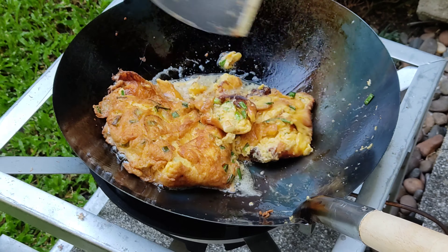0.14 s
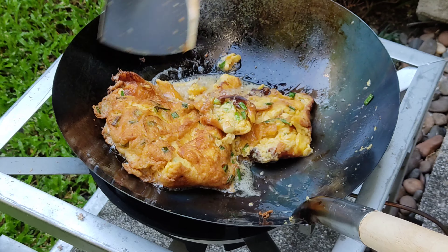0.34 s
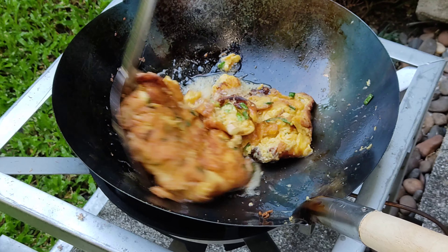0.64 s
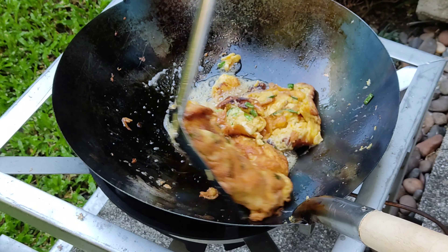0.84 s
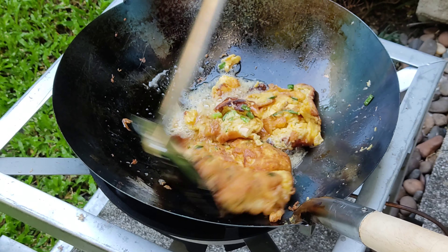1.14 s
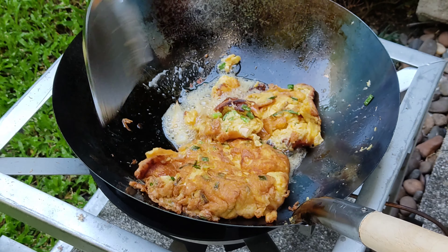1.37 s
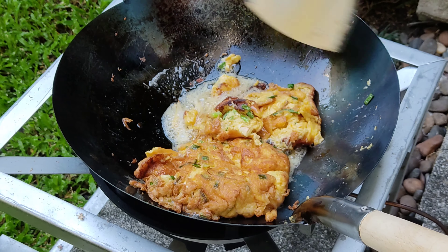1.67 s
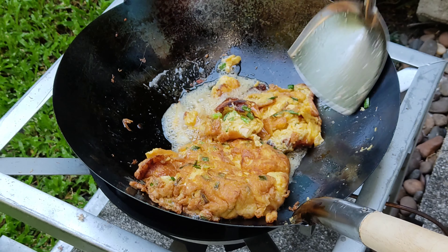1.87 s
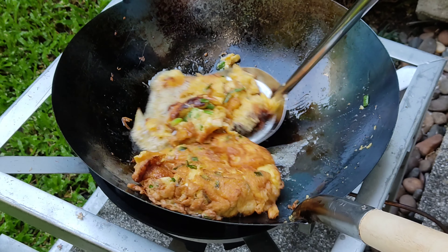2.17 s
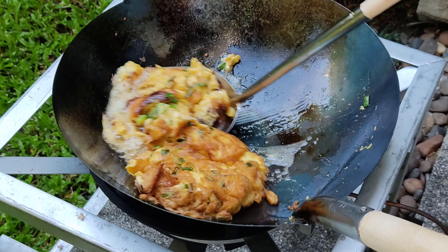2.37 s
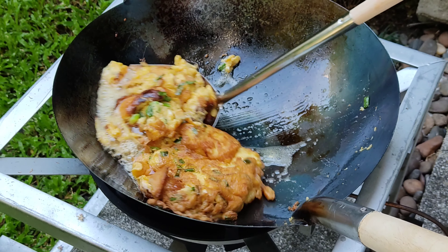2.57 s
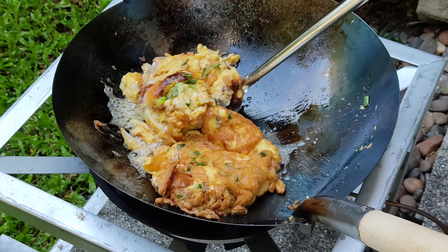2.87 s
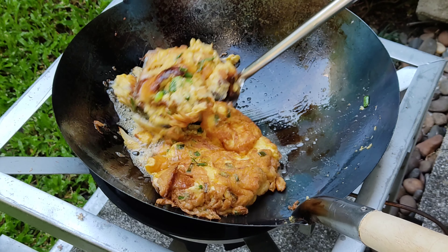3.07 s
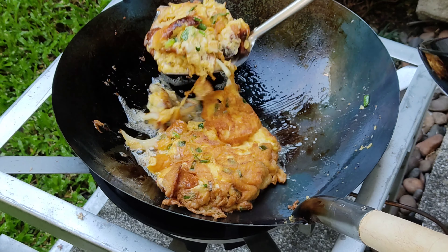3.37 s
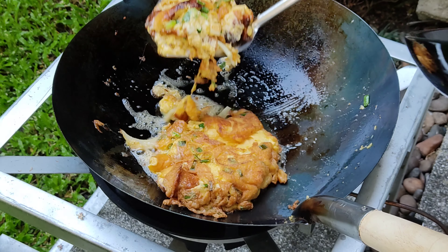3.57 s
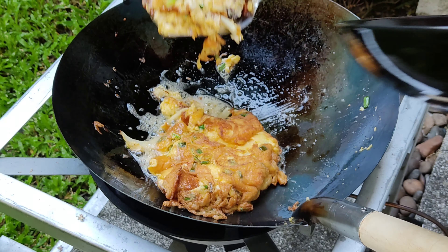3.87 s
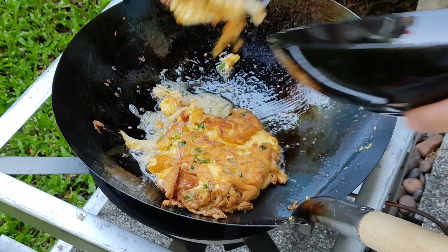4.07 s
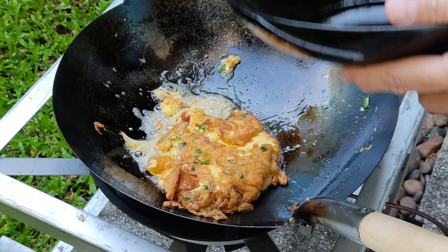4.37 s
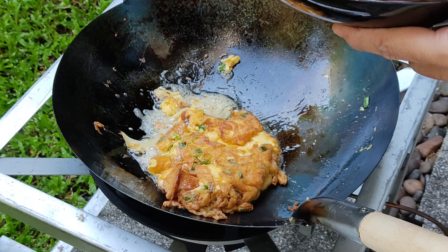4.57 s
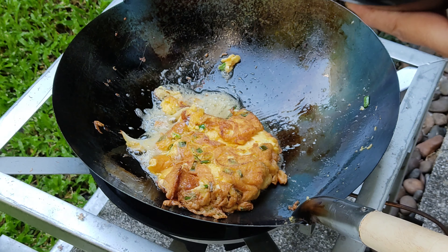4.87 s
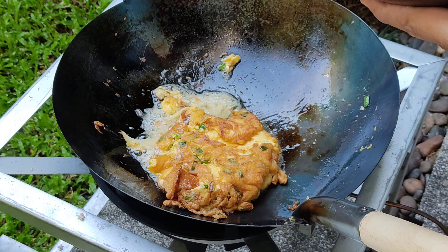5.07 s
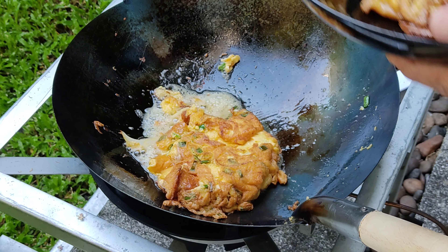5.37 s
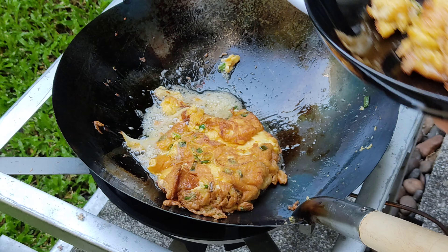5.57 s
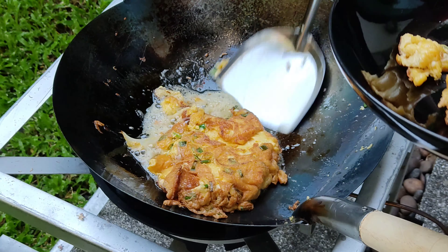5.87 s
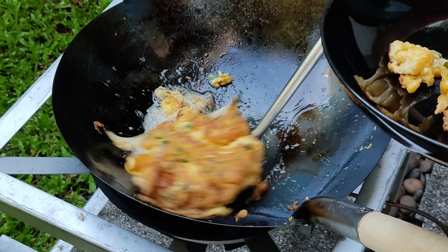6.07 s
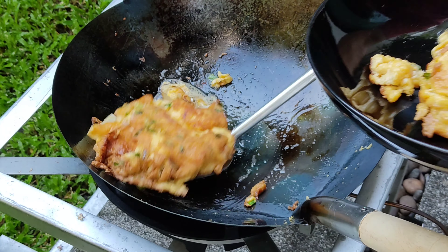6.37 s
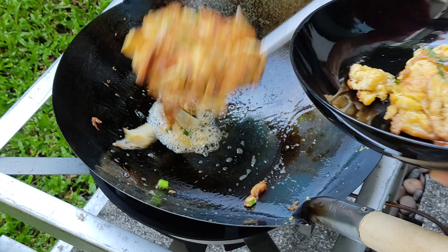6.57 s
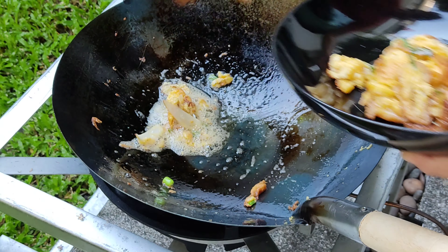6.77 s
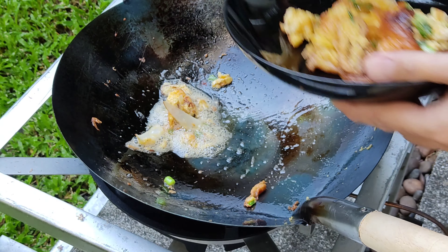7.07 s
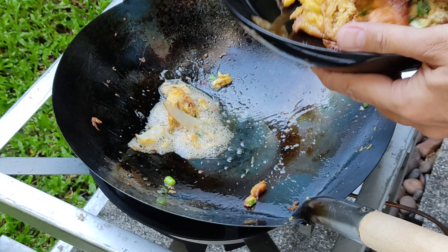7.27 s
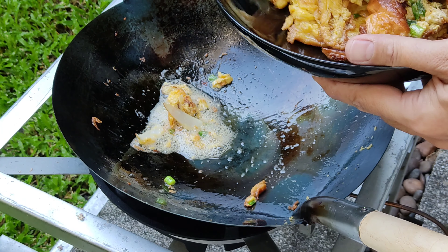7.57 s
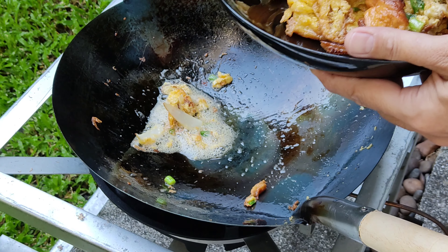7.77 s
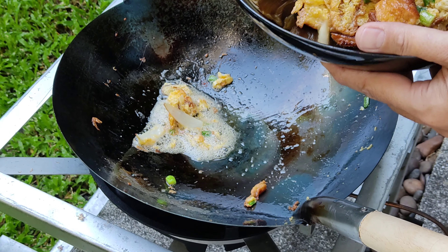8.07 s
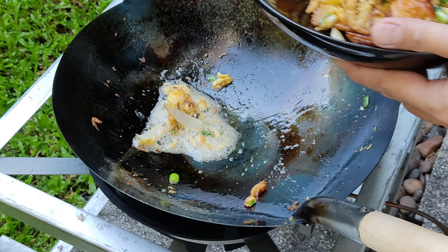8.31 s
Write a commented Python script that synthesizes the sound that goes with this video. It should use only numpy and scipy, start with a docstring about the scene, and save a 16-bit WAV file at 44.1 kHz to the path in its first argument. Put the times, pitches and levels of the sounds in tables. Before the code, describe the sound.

A close stereo microphone in a yard, battered by wind in its left side with irregular thuds and rumbling puffs. Beneath it are a thin flame hiss and light crackling oil. A metal spatula cracks against the wok and scrapes in three separate passes, ringing shortly with a faint metallic hum. Hard dry knocks on a plate fall between the second and third passes, and once at the end.

```python
"""Outdoors in a yard, over a gas burner, an omelette is lifted out of a steel wok.
The metal spatula lands (noise cracks and ringing modes), scrapes down the wall and scoops (trains of tiny
catches through moving resonances), and clacks against a plate, twice between the scrapes and once after
the last. Oil sizzles and spits in noise bursts, the flame hisses as shaped noise, and low noise in puffs
and sharp kicks is the moving air that buffets the microphone, mostly its left port."""
import sys
import numpy as np
from scipy import signal
from scipy.fft import rfft, irfft, next_fast_len
from scipy.io import wavfile
from scipy.ndimage import uniform_filter1d, map_coordinates

SR = 44100
rng = np.random.default_rng(int(sys.argv[2]) if len(sys.argv) > 2 else 0)


def transcribe(signal):
    """Save signal, clipped to [-1, 1], as a 16-bit WAV file at the path in sys.argv[1]."""
    frames = np.atleast_2d(signal).T
    limited = np.clip(frames, -1, 1)
    pcm = np.round(limited * 32767).astype(np.int16)
    wavfile.write(sys.argv[1], SR, pcm)


N = 372200
T = np.arange(N) / SR  # time of each sample in seconds

# The spatula lands in the wok. Each row: time in seconds, crack level in dB, blade ring level in dB,
# pitch of the touched spot's ping in Hz, ping level in dB over the crack level.
LANDINGS = [(0.552, -4.5, -26, 2130, -23), (.559, -17.5, -18, 2760, -2), (1.925, -6, -35, 1950, -13),
            (1.94, -23.5, -47, 2660, 1), (3.069, -22, -56, 5470, -14), (5.925, -27.5, -12.5, 1840, 2),
            (5.9377, -16, -13.5, 707, -3)]
# High modes of the spatula. Each row: pitch in Hz, relative level in dB, time to fall by 60 dB in seconds.
SPATULA_MODES = [(3168, -3, .1), (5440, -6, .11), (5862, -3, .13), (6023, -3, .13), (7400, -1, .12),
                 (7721, -1, .15), (7953, -3, .13), (8258, -1, .11), (8662, -2, .15), (8817, -3, .13),
                 (8963, -2, .12)]
# How a push of the spatula weakens while it lasts, and after its end, in dB a second.
PUSH_SAG_DB_PER_S, PUSH_FALL_DB_PER_S = 14, 271


def amp(db):
    """Decibels to gain."""
    return 10 ** (np.asarray(db) / 20)


def unit(x):
    """Scale to rms 1."""
    return x / np.sqrt(np.mean(x ** 2) + 1e-20)


def along(points, hz):
    """Read a curve of (Hz, value) points at any frequency, on a log axis."""
    f, v = np.transpose(points)
    return np.interp(np.log(hz + 1), np.log(f + 1), v)


def curves(rows):
    """One value per sample for each column after the time."""
    s, *cols = np.transpose(rows)
    return [np.interp(T, s, c) for c in cols]


def wobble(rate):
    """A smooth random curve with rate knots a second."""
    knots = rng.standard_normal(int(N * rate / SR) + 4)
    return map_coordinates(knots, [T * rate], order=2)


def envelope(start, rise, length, sag, fall):
    """A rise, a hold that sags, and after length seconds a release; sag and fall in dB a second."""
    t = np.maximum(T - start, 0)
    return np.minimum(t / rise, 1) * amp(-sag * t - fall * np.maximum(t - length, 0))


def add(track, s, sound):
    """Mix a sound in at time s."""
    part = track[..., max(round(s * SR), 0):][..., :sound.shape[-1]]
    part += sound[..., :part.shape[-1]]


def filtered(x, response):
    """Multiply the spectrum of x by a response that depends on frequency."""
    n = x.shape[-1]
    m = next_fast_len(n + 8192)
    return irfft(rfft(x, m) * response(np.fft.rfftfreq(m, 1 / SR)), m)[..., :n]


def coloured(x, spectrum):
    """x shaped by a spectrum, at rms 1."""
    return unit(filtered(x, lambda hz: amp(along(spectrum, hz))))


def spread(pair):
    """Two unrelated signals become left and right, alike at long wavelengths."""
    # Each row: frequency in Hz, likeness of left and right from 0 to 1.
    likeness = [(100, 1), (700, 0.33), (1600, 0.039), (3200, 0), (12000, 0)]
    turn = lambda hz: np.arccos(np.clip(along(likeness, hz), -1, 1)) / 2
    mid, side = filtered(pair, lambda hz: np.array([np.cos(turn(hz)), np.sin(turn(hz))]))
    return np.array([mid + side, mid - side])


def grainy(rate, size_db):
    """Stereo train of tiny noise bursts of uneven size, about rate a second."""
    sizes = (rng.random(N) < rate / SR) * amp(size_db * np.minimum(rng.exponential(size=N), 4))
    power = np.convolve(sizes ** 2, np.exp(-np.arange(64) / 10))[:N]
    return unit(np.sqrt(power) * rng.standard_normal((2, N)))


def burst(spectrum, t60):
    """A stereo crack of coloured noise that dies away by 60 dB in t60 seconds."""
    t = T[:SR // 4]
    noise = spread(rng.standard_normal((2, len(t))))
    return coloured(noise, spectrum) * amp(-60 * t / t60)


def ring(modes):
    """Struck modes as fading sines; the higher ones reach the two ports more out of phase."""
    t = T[:int(SR * min(2, 2 * max(t60 for *_, t60 in modes)))]
    out = np.zeros((2, len(t)))
    for hz, db, t60 in modes:
        phase = rng.normal(0, hz / 5000, (2, 1))
        strength = amp(db + rng.normal() - 60 * t / t60)  # each strike differs a little
        out += strength * np.sin(2 * np.pi * hz * t + phase)
    return out


def shimmer(x, t60, count):
    """The wok's crowd of high modes rings on after each bit of x."""
    t = T[:SR // 4]
    hz = rng.uniform(2400, 15000, (count, 1))
    weights = rng.standard_normal((2, count))
    response = weights @ np.sin(2 * np.pi * hz * t) * amp(-60 * t / t60)
    return signal.fftconvolve(x, response / np.linalg.norm(response[0]), axes=1)[:, :N]


def resonate(x, peaks, bend):
    """x through resonances that all move in pitch with bend."""
    hz, s, z = signal.stft(x, SR, nperseg=1024)
    pitch = np.interp(s, T, bend)
    gain = 0
    for f, width, db in peaks:
        distance = (hz[:, None] - f * pitch) / (width / 2)
        gain = gain + amp(db) / (1 + distance ** 2)
    return unit(signal.istft(z * gain, nperseg=1024)[1][:, :N])


def crossing(x):
    """The contact slides over nodes and antinodes, so narrow bands swell, glide and drop out."""
    depth = .014  # share by which the bands wander in pitch as the contact moves
    z = signal.stft(x, nperseg=512)[2]
    rows, cols = np.indices(z.shape[1:])
    drift = 1 + depth * wobble(14)[np.linspace(0, N - 1, z.shape[2]).astype(int)]
    field = map_coordinates(rng.standard_normal(z.shape[1:]), [rows * drift / 2, cols / 6], order=2)
    gain = np.hypot(np.tanh(.7 * field), .08)  # never quite silent
    return unit(signal.istft(z * gain, nperseg=512)[1][:, :N])


def scrape():
    """The edge catches on the steel thousands of times a second; the blade's resonances sink as it slides down."""
    # Pushes of the spatula along the steel. Each row: start in seconds, rise in seconds,
    # length in seconds, rasp level in dB, level in dB of the groan of the pressed wall.
    pushes = [(0.548, 0.0057, 0.08, -32, -34.5), (0.632, 0.0086, 0.061, -29, -37.5),
              (1.925, 0.0041, 0.038, -32, -36), (2, 0.048, 0.22, -34, -44.5),
              (2.183, 0.011, 0.015, -30, -49), (2.225, 0.028, 0.057, -40.5, -48),
              (2.362, 0.068, .08, -47, -37.5), (2.417, .02, 0.094, -45.5, -38.5),
              (2.646, 0.0033, 0.005, -49, -39), (2.676, 0.014, 0.049, -55, -39),
              (3.068, 0.0036, 0.004, -43, -40), (3.08, .004, .02, -50.5, -50),
              (5.919, 0.013, 0.13, -38, -33.5), (5.962, 0.078, 0.18, -29.5, -42),
              (6.116, 0.024, 0.12, -34.5, -41.5), (6.302, 0.057, 0.12, -51, -44)]
    # Resonances of the sliding blade. Each row: pitch in Hz before it bends, width in Hz, relative level in dB.
    sliding = [(1666, 125, 2.5), (2060, 400, -7.5), (2740, 84, 3), (3220, 44, 7), (4570, 420, 0),
               (5700, 290, 2), (6320, 150, 2), (7370, 160, 5), (7800, 82, 6.5), (8750, 260, -1)]
    # Low resonances of the wall under a hard push. Each row: pitch in Hz before it wavers, width in Hz,
    # relative level in dB.
    groan = [(668, 80, 3.5), (1130, 200, -3), (1520, 110, -6), (2050, 400, -17)]
    # Colour of the rasp. Each row: frequency in Hz, relative level in dB.
    rasp_colour = [(300, -28), (1000, -51), (2300, -8), (3100, -6.5), (4000, -3.5), (5000, -5.5),
                   (6000, -6.5), (7500, -4.5), (9000, -3.5), (10000, -14), (11300, -23.5), (12500, -16),
                   (15000, -29.5)]
    sink_per_s2 = 0.193  # share by which the resonances sink after a landing, per second squared

    rasp, press, bend = np.zeros(N), np.zeros(N), np.ones(N)
    for s, rise, length, rasp_db, press_db in pushes:
        contact = envelope(s, rise, length, PUSH_SAG_DB_PER_S, PUSH_FALL_DB_PER_S)
        rasp = np.maximum(rasp, contact * amp(rasp_db))
        press = np.maximum(press, contact * amp(press_db))
    for landing, *_ in LANDINGS:
        bend = np.where(T > landing, 1 - sink_per_s2 * np.clip(T - landing, 0, 1) ** 2, bend)

    waver = 1 + .024 * wobble(16)
    judder = amp(1.9 * wobble(190))  # stick and slip
    hand = amp(.7 * wobble(28))  # the pressure of the hand is uneven
    unevenness = hand * judder
    edge = rasp * unevenness * crossing(coloured(grainy(rate=3300, size_db=1.5), rasp_colour))
    catches = spread(grainy(rate=2000, size_db=3.5))
    blade = rasp * unevenness * crossing(resonate(catches, sliding, bend * waver))
    wall = press * unevenness * resonate(catches, groan, waver)
    afterring = shimmer(edge, t60=0.07, count=1200)
    modes = ring(SPATULA_MODES)[:, :SR // 4]
    singing = signal.fftconvolve(edge, modes / np.linalg.norm(modes[0]), axes=1)[:, :N]
    return amp(3.5) * edge + amp(0.5) * afterring + amp(-5.5) * singing + amp(3.0) * blade + wall


def grate(length, first_hz, last_hz, width):
    """A rough gliding partial: a tone whose strength and phase tremble."""
    t = T[:round((length + .15) * SR)]
    phase = 2 * np.pi * np.cumsum(np.interp(t, [0, length], [first_hz, last_hz])) / SR
    knots = rng.standard_normal((4, 1024))
    place = t * width * first_hz
    tremble = np.array([map_coordinates(k, [place], order=2, mode="wrap") for k in knots])
    return tremble[:2] * np.cos(phase) + tremble[2:] * np.sin(phase)


def partials():
    """During the scrapes the edge bites and grates, each time at one sliding pitch."""
    # Each row: start in seconds, length in seconds, first pitch in Hz, last pitch in Hz, level in dB.
    bites = [(.62, .05, 1720, 1650, -32), (.625, .04, 2850, 2700, -38), (.662, .045, 6100, 5900, -28),
             (2.04, .04, 1990, 1940, -33), (2.088, .045, 3190, 3260, -32), (2.115, .07, 1680, 1620, -37),
             (2.1, .05, 4400, 4600, -33), (2.19, .025, 6200, 6050, -28), (2.25, .2, 1570, 1520, -47),
             (2.395, .065, 3200, 3080, -43), (6.05, .033, 3200, 3380, -30), (6.05, .06, 5850, 5980, -25),
             (6.135, .04, 5600, 5750, -31), (6.21, .03, 5950, 5850, -29)]
    rise_s, width = .012, .04  # width of the tremble as a share of the pitch
    out = np.zeros((2, N))
    for s, length, first_hz, last_hz, db in bites:
        tone = grate(length, first_hz, last_hz, width)
        shape = envelope(0, rise_s, length, PUSH_SAG_DB_PER_S, fall=1400)
        add(out, s, amp(db) * tone * shape[:tone.shape[1]])
    return out


def clinks():
    """Each landing cracks and rings the blade briefly; the wok wall hums for longer."""
    # Modes of the blade pressed on the steel. Each row: pitch in Hz, relative level in dB,
    # time to fall by 60 dB in seconds.
    blade_modes = [(665, -13, .12), (740, -14, .08), (875, -16, .1), (1470, -7, .07), (1535, -7, .08),
                   (1653, 0, .13), (1760, -7, .05), (1860, -5, .07), (1960, -10, .05), (2641, -16, .12)]
    # Long modes of the wok wall. Each row: pitch in Hz, relative level in dB, time to fall by 60 dB in seconds.
    wall_modes = [(1098, -17, 1.5), (1653, -4.5, 1.7), (1664, -16, 1.4), (2299, -13, 1.6)]
    # The blade or the falling omelette sets the wall humming, loudest when it is left free.
    # Each row: start in seconds, level in dB.
    hums = [(0, -53), (.553, -38.5), (1.37, -54), (1.925, -48), (5.925, -53)]
    # Colour of the crack. Each row: frequency in Hz, relative level in dB.
    strike_colour = [(300, 1), (700, -56), (1600, -2.5), (2700, -5), (3700, -12), (4500, -2), (6000, -1),
                     (8500, -0.5), (10000, -10.5), (11500, -26), (15000, -19)]
    chatter, chatter_per_s = .35, 170  # the blade rattles on the steel as it rings: depth, rate

    cracks, tones = np.zeros((2, N)), np.zeros((2, N))
    for s, db, blade_db, ping_hz, ping_db in LANDINGS:
        add(cracks, s, amp(db - 8.5) * burst(strike_colour, t60=0.046))
        clang = ring(blade_modes)
        rattle = 1 + chatter * wobble(chatter_per_s)[:clang.shape[1]]
        add(tones, s, amp(blade_db - 6.5) * clang * rattle)
        add(tones, s, ring([(ping_hz, db + ping_db, .06)]))
    for s, db in hums:
        hum = ring(wall_modes)
        waver_db = 1.5 * wobble(14)[:hum.shape[1]]
        add(tones, s, amp(db + waver_db) * hum)
    return cracks + amp(-1.5) * shimmer(cracks, t60=0.04, count=200) + tones


def clacks():
    """Short knocks on a plate damped by hand and food; each spot has its own pings and the spatula rings on."""
    # Each row: time in seconds, knock level in dB, then over that level the plate ring in dB and spatula
    # ring in dB; the touched spot's low ping in Hz and dB over the knock, its high ping in Hz and dB likewise.
    knocks = [(4.6822, -11.5, -5, 10, 3400, -2.5, 7300, -8), (4.6852, -12.5, 8.5, -6, 1190, -9, 1660, -2.5),
              (4.873, -11, -11, -6, 2130, -7.5, 8500, -6), (7.4652, -12, -23, -6, 4300, -9, 8090, -2.5),
              (7.4665, -24, -20, -8, 1140, 6, 3180, 1), (7.467, -26.5, -22, -10, 1900, 1.5, 5530, 1)]
    # Modes of the plate with the spatula on it. Each row: pitch in Hz, relative level in dB,
    # time to fall by 60 dB in seconds.
    plate_modes = [(668, -3, .11), (790, -5, .04), (1061, -1, .06), (1577, -7, .1), (1890, -3, .05),
                   (2110, 2, .08), (2230, -3, .06), (2610, -7, .05), (3370, 3, .05), (3480, 2, .035),
                   (7380, -4, .1)]
    # Colour of the knock. Each row: frequency in Hz, relative level in dB.
    knock_colour = [(300, -21), (700, -26), (1100, 0.5), (1900, 9.5), (2450, 5.5), (3200, 9), (3800, 3),
                    (4400, -4), (5500, 5), (6700, -5), (8300, 12.5), (9500, -1), (11000, -15), (15000, -24)]

    cracks, tones = np.zeros((2, N)), np.zeros((2, N))
    for s, db, plate_db, spatula_db, low_hz, low_db, high_hz, high_db in knocks:
        add(cracks, s, amp(db - 5.0) * burst(knock_colour, t60=0.015))
        add(tones, s, amp(db + plate_db - 28.0) * ring(plate_modes))
        add(tones, s, amp(db + spatula_db - 38) * ring(SPATULA_MODES))
        add(tones, s, ring([(low_hz, db + low_db, .013), (high_hz, db + high_db, .013)]))
    return cracks + tones + amp(-12) * shimmer(cracks, t60=.05, count=200)


def oil():
    """Countless tiny bubbles burst in the oil; now and then a drop of water spits."""
    # Bubbling of the oil, which flares when the omelette is turned or lifted.
    # Each row: time in seconds, sizzle level in dB.
    frying = [(0, -53), (.5, -56.5), (.9, -54.5), (1.3, -57), (1.37, -51), (1.44, -58.5), (2.3, -57),
              (2.6, -53), (2.8, -49.5), (3.2, -54), (3.9, -58), (8.44, -59.5)]
    # Colour of the sizzle. Each row: frequency in Hz, relative level in dB.
    sizzle_colour = [(2500, -9), (5000, -10), (6500, -4.5), (7800, -1), (9100, 1), (10200, -14.5),
                     (13500, -26), (15000, -51)]
    # Each row: time in seconds, level in dB, pitch in Hz.
    spits = [(0.514, -28, 9100), (1.834, -25.5, 9200), (2.611, -21, 8260), (2.635, -25, 7800),
             (2.71, -18.5, 7600), (2.756, -19, 8800), (2.779, -21, 8500), (2.82, -18, 7840),
             (2.965, -23.5, 9450), (3.39, -23.5, 8600)]

    heat_db, = curves(frying)
    out = amp(heat_db + 2.5) * coloured(grainy(rate=4600, size_db=-0.5), sizzle_colour)
    for s, db, hz in spits:
        pop = [(hz / 4, -25), (hz * .7, -11), (hz, 0), (hz * 1.3, -19), (hz * 1.8, -34)]
        add(out, s, amp(db - 8.0) * burst(pop, t60=0.014))
    return out


def burner():
    """The gas flame's soft roar: shaped noise at an almost steady level."""
    # Each row: frequency in Hz, relative level in dB.
    flame_colour = [(25, 18.5), (60, 12.5), (120, -12), (170, 8), (220, 8.5), (300, 6.5), (500, 3),
                    (1000, -3), (1500, -9), (2400, -12), (4500, -27.5), (9000, -33), (15000, -34.5)]
    roar = coloured(spread(rng.standard_normal((2, N))), flame_colour)
    return amp(-43.5 + 0.72 * wobble(4.6)) * roar


def turbulence(spectrum, span):
    """Low noise whose strength is evened out over span seconds."""
    x = coloured(rng.standard_normal(N), spectrum)
    return x / np.sqrt(abs(uniform_filter1d(x ** 2, max(int(span * SR), 2))) + 0.0057)


def airflow():
    """Strength of the buffeting at the left and right ports: puffs over calmer air."""
    # Air between the puffs. Each row: time in seconds, buffet level in dB.
    calm = [(0, -26.5), (2, -26), (3.5, -39), (4.2, -29.5), (4.55, -47.5), (5.2, -30), (6.2, -29),
            (7.5, -43), (8.44, -25)]
    # Puffs at the left port. Each row: start in seconds, length in seconds, buffet level in dB.
    puffs = [(-.02, 0.16, -22), (0.315, 0.12, -23), (0.494, 0.24, -22.5), (0.743, 0.28, -20.5),
             (1.092, 0.52, -21), (1.501, 0.22, -19.5), (1.789, 0.074, -20), (2.04, 0.35, -23.5),
             (2.383, 0.22, -19.5), (2.735, 0.2, -24), (2.983, 0.33, -22), (3.336, 0.25, -22),
             (3.638, 0.058, -23), (3.722, 0.08, -23.5), (3.842, 0.089, -24.5), (4.038, 0.11, -23.5),
             (4.313, 0.072, -25), (4.656, 0.033, -28), (4.746, 0.09, -25.5), (4.85, 0.22, -21.5),
             (5.236, 0.32, -23.5), (5.643, 0.14, -22), (5.809, 0.14, -20), (5.993, 0.18, -20.5),
             (6.338, .12, -19.5), (6.56, 0.1, -24), (6.829, 0.19, -23.5), (7.196, 0.13, -22),
             (7.474, 0.053, -19.5), (7.61, 0.061, -19), (7.774, 0.08, -22), (7.935, 0.078, -25.5),
             (8.106, 0.15, -20.5)]
    # Swells that reach the sheltered right port. Each row: start in seconds, length in seconds, buffet level in dB.
    lee_swells = [(0, 0.81, -37), (0.728, 0.048, -27), (0.944, 0.077, -31), (1.3, 0.53, -39),
                  (1.998, 0.62, -36), (2.7, 0.34, -38), (3.554, 0.48, -39), (4.85, 0.33, -33.5),
                  (5.306, 0.48, -39), (5.752, 0.16, -33), (6.15, 0.12, -36), (7.085, 0.059, -29),
                  (7.8, 0.21, -35), (8.146, 0.33, -41)]
    lee_calm_db = -58
    left, right = amp(curves(calm)[0]), np.full(N, amp(lee_calm_db))
    for s, length, db in puffs:
        puff = envelope(s, rise=0.0087, length=length, sag=7, fall=246)
        left = np.maximum(left, amp(db) * puff)
    for s, length, db in lee_swells:
        swell = envelope(s, rise=0.023, length=length, sag=10, fall=73)
        right = np.maximum(right, amp(db) * swell)
    return left, right


def wind():
    """Swirls press on the ports; stronger flow adds faster flutter and sharp eddies with a low wake; slow ones thump."""
    # Colours of the slow buffet, the faster flutter, the sharp eddies and the low wake behind them.
    # Each row: frequency in Hz, relative level in dB.
    buffet_colour, flutter_colour = [(10, -5.5), (30, 0), (60, -2), (110, -8), (180, -3.5), (250, -10.5),
                                     (350, -20.5), (600, -70), (1200, -88)], [(100, -6.5), (200, -2), (300, -1), (400, -4),
                                                     (550, -16), (800, -29.5), (1300, -53.5), (2500, -79)]
    eddy_colour, wake_colour = [(40, -13), (200, 2), (400, 6.5), (700, -9), (1100, -30.5), (1700, -71),
                                (3500, -61)], [(40, -19), (150, -0.5), (240, -2), (380, -13), (700, -39.5),
                                              (1500, -82)]
    # Each row: time in seconds, level of the flutter over the buffet in dB.
    brisk = [(0, -11), (2.6, -11.5), (3.4, -16.5), (5.3, -15), (8.44, -15.5)]
    # The sharpest eddies hitting the left port. Each row: time in seconds, level in dB.
    sharp_eddies = [(0.113, -17.5), (0.261, -15), (0.377, -19), (0.469, -23), (0.833, -17), (0.973, -20),
                    (1.212, -17), (1.229, -17), (1.243, -17.5), (1.42, -18), (1.587, -13.5), (1.829, -16.5),
                    (1.864, -21), (1.901, -19), (2.213, -15.5), (2.274, -18), (2.445, -22), (3.257, -22),
                    (3.454, -19), (3.578, -21.5), (3.948, -21), (5.403, -22), (5.891, -19), (5.993, -18.5),
                    (6.689, -23), (7.289, -23), (7.479, -16), (7.613, -17), (8.321, -19)]
    # Slow swirls that only thump. Each row: start in seconds, level in dB.
    thumps = [(0.129, -11), (.335, -16), (.515, -12.5), (0.591, -13.5), (0.669, -18), (.768, -15),
              (0.866, -10.5), (1.14, -9.5), (1.162, -27), (1.288, -22), (1.375, -12.5), (1.396, -19.5),
              (1.585, -12), (1.677, -16), (2.067, -19.5), (2.147, -12), (2.317, -14), (2.41, -13),
              (2.504, -11.5), (2.522, -18.5), (2.751, -15), (2.808, -11.5), (2.88, -15), (3.051, -16.5),
              (3.128, -13), (3.258, -11), (3.52, -14), (3.666, -17), (3.772, -17), (4.048, -13),
              (4.155, -14), (4.952, -18.5), (4.984, -15.5), (5.052, -12), (5.113, -13), (5.312, -20.5),
              (5.485, -15), (5.723, -18), (5.821, -12.5), (5.857, -18), (6.038, -13), (6.228, -11.5),
              (6.602, -14.5), (6.69, -10.5), (6.947, -12.5), (7.298, -15), (7.81, -14), (8.218, -15)]
    flutter_grows, flutter_ref_db = 0.74, -23.5  # extra dB of flutter per dB of buffet above this level
    small_per_s, small_db = 4, -5.5  # weaker eddies come at random; their level over the buffet
    core_s, core_db = .00034, -2  # kick as an eddy's core passes: typical half-width, level over the eddy's

    flow, lee = airflow()
    flow = flow * amp(1.89 * wobble(24))
    left = amp(5.0) * flow * turbulence(buffet_colour, span=0.0444)
    lumps = amp(8 * np.tanh(.8 * wobble(75)))
    flutter = flow * (flow / amp(flutter_ref_db)) ** flutter_grows * amp(curves(brisk)[0])
    left += amp(6.0) * flutter * lumps * turbulence(flutter_colour, span=0.017)

    t = T[:SR // 10]
    swell = lambda rise: t / rise * np.exp(1 - t / rise)
    swirl = coloured(turbulence(eddy_colour, span=.005), [(1300, 0), (2000, -18), (4000, -60)])
    wake = turbulence(wake_colour, span=0.046)
    small = np.flatnonzero(rng.random(N - len(t)) < small_per_s / SR)
    eddies = [(s, amp(db)) for s, db in sharp_eddies]
    eddies += [(T[i], flow[i] * amp(small_db)) for i in small]
    for s, size in eddies:
        now = slice(round(s * SR), round(s * SR) + len(t))
        eddy = amp(-12.5) * unit(swell(.0025) * swirl[now])
        eddy += amp(-11) * unit(swell(.009) * wake[now])
        u = (t - .002) / (core_s * rng.uniform(.8, 1.3))
        core = -u * np.exp((1 - u ** 2) / 2)  # pressure swings up, then down
        add(left, s - .001, size * (amp(3.0) * eddy + amp(core_db) * core))
    for s, db in thumps:
        now = slice(round(s * SR), round(s * SR) + len(t))
        add(left, s, amp(db - 8.5) * unit(swell(.006) * wake[now]))
    left = .8 * np.tanh(left / .8)  # the port saturates in the hardest buffets
    right = lee * amp(5.3 * wobble(28)) * turbulence(buffet_colour, span=0.097)
    return np.array([left, right + amp(-40.0) * left])


def yard(x):
    """A short diffuse answer from nearby walls: x smeared by fading noise."""
    # Each row: frequency in Hz, time to fall by 60 dB in seconds.
    yard_decay = [(300, 0.26), (3000, 0.21), (8000, 0.22), (14000, 0.085)]
    hz, t, z = signal.stft(rng.standard_normal((2, SR // 2)), SR, nperseg=256)
    fading = amp(-60 * t / along(yard_decay, hz)[:, None])
    tail = signal.istft(z * fading, SR, nperseg=256)[1]
    tail = np.pad(tail, ((0, 0), (SR // 200, 0)))  # the answer starts 5 ms late
    return signal.fftconvolve(x, tail / np.linalg.norm(tail[0]), axes=1)[:, :N]


def scene():
    """Spatula, oil and flame close by, under the wind; the plate is nearest and so the driest."""
    wok = scrape() + partials() + clinks()
    plate = clacks()
    echo = amp(-7.5) * yard(wok + amp(-3.5) * plate)
    return wok + plate + echo + oil() + burner() + wind()


def record(dry):
    """Each port colours the treble in its own way, peaks are rounded off, and the top of the band is cut."""
    # The two ports resonate at different pitches. Each row: frequency in Hz, left minus right in dB.
    port_tilt = [(1200, 3), (2500, -0.5), (5000, -2), (6600, -6), (7800, -11), (8500, -1.5), (9300, 8),
                 (10000, 14), (11000, 0)]
    top_hz = 15300
    ports = filtered(dry, lambda hz: amp(np.outer([1, -1], along(port_tilt, hz)) / 2))
    rounded = ports / (1 + (ports / .8) ** 6) ** (1 / 6)
    return filtered(rounded, lambda hz: 1 / (1 + (hz / top_hz) ** 100))


dry = scene()
out = record(dry)
transcribe(out)
```